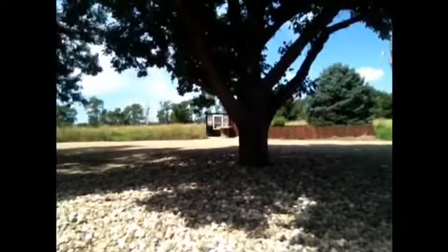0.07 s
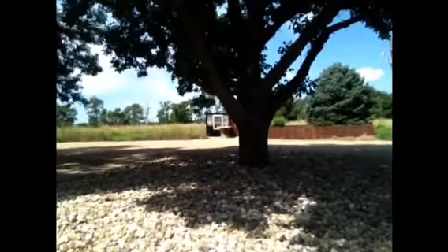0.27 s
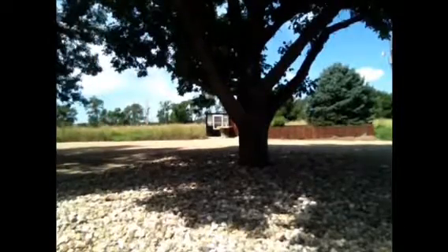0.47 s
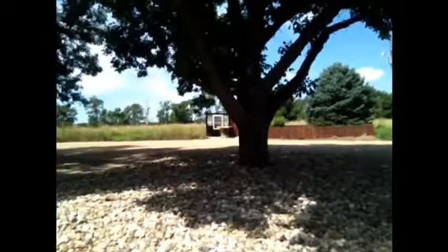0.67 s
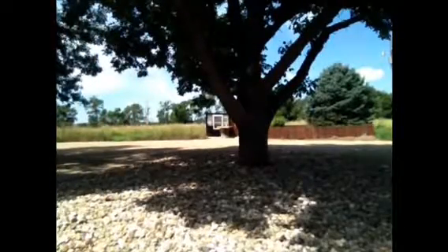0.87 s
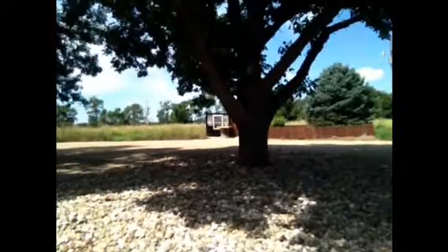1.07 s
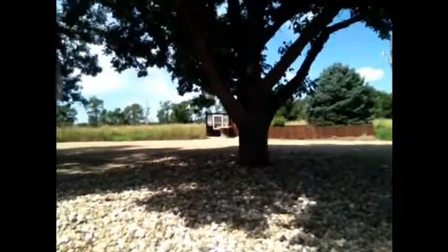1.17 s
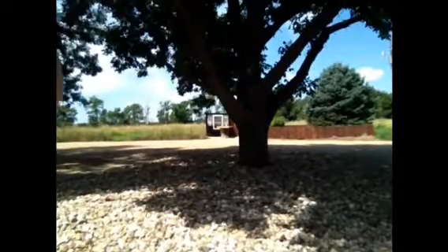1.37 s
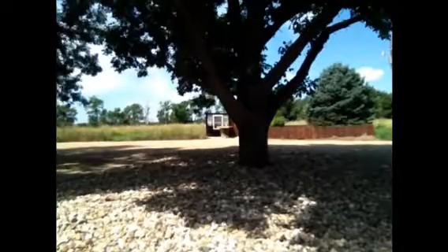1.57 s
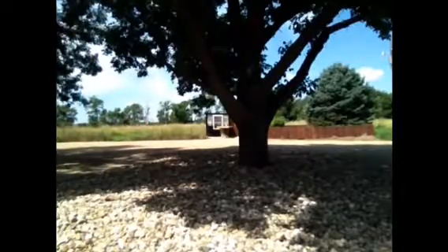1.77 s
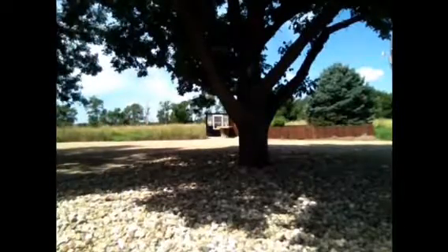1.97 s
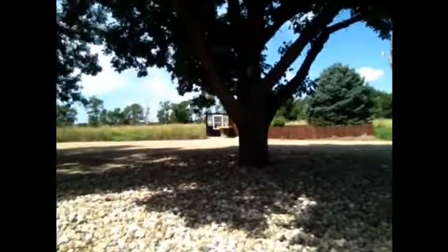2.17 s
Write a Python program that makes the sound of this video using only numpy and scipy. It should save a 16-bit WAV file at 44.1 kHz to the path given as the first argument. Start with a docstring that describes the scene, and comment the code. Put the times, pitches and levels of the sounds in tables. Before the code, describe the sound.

A hollow knock, as of a door closing near the microphone, breaks the quiet of a yard. Soft taps and ticks lead to two hard clacks and a settling rattle, over faint distant birds, low murmur and hiss.

```python
"""One hollow knock close by, as of a door shutting: a struck panel rings in its modes and a wall echoes it.
Small handling ticks and two soft taps follow, then two dry clacks of hard contact, each with a gritty
scuff, and a dull settling rattle. Around this quiet yard far birds whistle and trill, their sound
scattered by trees, over a low outdoor murmur and microphone hiss with one soft bump at the end."""
import sys
import numpy as np
from scipy import signal
from scipy.fft import rfft, irfft
from scipy.io import wavfile

SR = 44100
rng = np.random.default_rng(int(sys.argv[2]) if len(sys.argv) > 2 else 0)


def log_audio(samples):
    """Write samples as a 16-bit WAV file to the path given in sys.argv[1]."""
    # one column per channel
    frames = np.atleast_2d(samples).T
    # limit to full scale, then quantise
    limited = np.clip(frames, -1, 1)
    pcm = np.round(limited * 32767).astype(np.int16)
    wavfile.write(sys.argv[1], SR, pcm)


N = 97020


def undb(db):
    """Amplitude ratio of a level in decibels."""
    return 10 ** (np.asarray(db) / 20)

def seconds(length):
    """Time axis of the given length."""
    return np.arange(max(int(length * SR), 8)) / SR

def fade(t60):
    """Exponential decay by 60 dB in t60 seconds."""
    return np.exp(-np.log(1000) * np.arange(N) / SR / max(t60, 1e-4))

def unit(x):
    """Normalisation to rms 1."""
    return x / np.sqrt(np.mean(x ** 2))

def add(out, at, x):
    """Superposition: x joins out at a time in seconds."""
    i = int(np.clip(at * SR, 0, N - 1))
    out[i:i + len(x)] += x[:N - i]

def shape(x, gain):
    """Linear filtering: the spectrum is multiplied by gain(frequency)."""
    hz = np.arange(N + 1) * SR / (2 * N) + 0.00084  # the offset keeps log(hz) finite
    return irfft(rfft(x, 2 * N) * gain(hz))[:len(x)]

def colour(x, points, tilt_db=0):
    """Spectral shaping by (Hz, dB) points and a tilt per octave, at rms 1."""
    hz, db = np.array(points).T
    db = db + tilt_db * np.log2(hz)
    return unit(shape(x, lambda f: undb(np.interp(np.log(f), np.log(hz), db))
                      * np.minimum(f / hz[0], 1) ** 2))

def noise():
    """Gaussian white noise."""
    return rng.standard_normal(N)

def band(hz, width, order):
    """Band-pass noise; a higher order gives steeper sides."""
    return unit(shape(noise(), lambda f: 1 / (1 + np.abs((f * f - hz * hz) / (f * width)) ** order)))

def walk(rate_hz):
    """Random fluctuation: low-pass noise at rms 1."""
    return unit(shape(noise(), lambda f: np.exp(-(f / rate_hz) ** 2)))

def modes(table):
    """Free vibration: a sum of damped sinusoids of alternating sign."""
    t = seconds(.4)
    return sum((-1) ** k * undb(db) * np.sin(2 * np.pi * hz * t) * np.exp(-np.log(1000) * t / t60)
               for k, (hz, db, t60) in enumerate(table))

def reverberation(table, rise_s, width):
    """A diffuse field builds up, then decays band by band; width is a share of each centre."""
    bands = sum(undb(db) * band(hz, width * hz, order=4) * fade(t60) for hz, db, t60 in table)
    return (1 - fade(rise_s)) * bands


# Spectrum of the impact's crack. Each row: frequency in Hz, relative level in dB.
CRACK_SPECTRUM = [(300, 3), (1200, 3.5), (3200, -11), (4200, -4), (8000, -14), (10500, -20), (13500, -16),
                  (16000, -25.5)]
# Modes of the panel. Each row: frequency in Hz, level in dB, T60 in seconds.
PANEL_MODES = [(250, -22, 0.028), (311, -34.5, .22), (399, -32, 0.26), (453, -15.5, 0.053),
               (604, -25, 0.13), (669, -18, 0.063), (820, -22.5, 0.052), (882, -26.5, 0.053),
               (972, -18.5, .045), (1202, -13.5, 0.035), (2305, -17, 0.015), (2865, -17.5, 0.015),
               (3128, -19, 0.01)]
# Reverberation of the knock. Each row: band centre in Hz, level in dB, T60 in seconds.
KNOCK_REVERB = [(157, -42.5, 0.34), (230, -40, 0.42), (497, -26.5, 0.28), (860, -28, 0.23),
                (1418, -34, 0.16), (2610, -43, .21), (4450, -44.5, .21), (8120, -47.5, 0.24),
                (12980, -61, 0.56)]
# A first touch, then the full blow. Each row: start in seconds, gain in dB.
KNOCK_BLOWS = [(0.2094, -12), (0.2146, 2.5)]

def knock():
    """Impact excitation: a crack sets the panel's modes ringing; a wall reflects the midrange."""
    echo_delay_s, echo_db, echo_hz = .0283, -6, 810
    blow = undb(-16) * colour(noise(), CRACK_SPECTRUM) * fade(t60=.013)
    add(blow, 0, modes(PANEL_MODES))
    echo = undb(echo_db) * signal.lfilter(*signal.iirpeak(echo_hz, Q=1.4, fs=SR), blow)
    blow += reverberation(KNOCK_REVERB, rise_s=0.02, width=0.77)
    add(blow, echo_delay_s, echo)
    out = np.zeros(N)
    for at, db in KNOCK_BLOWS:
        add(out, at, undb(db) * blow)
    return out


# Modes of the clacked body. Each row: frequency in Hz, level in dB, T60 in seconds.
BODY_MODES = [(664, -19.5, 0.012), (686, -27.5, 0.095), (985, -14.5, 0.0094), (1450, -44, 0.088),
              (2339, -30.5, 0.089), (4030, -45.5, 0.093)]
# Reverberation of a clack. Each row: band centre in Hz, level in dB, T60 in seconds.
CLACK_REVERB = [(268, -39, 0.27), (518, -33.5, 0.12), (880, -31, 0.12), (1320, -32, 0.16),
                (2350, -37.5, 0.14), (4290, -45.5, 0.17), (7640, -48.5, 0.2)]
# Two clacks, then the rattle. Each row: start in seconds, gain in dB, contact pitch in Hz,
# contact T60 in seconds.
CLACK_HITS = [(1.5145, -1.5, 1575, 0.011), (1.7243, -5, 930, 0.0049), (1.7872, -32, 1320, .015),
              (1.7945, -24, 1440, 0.0073), (1.7979, -19.5, 1670, 0.014), (1.811, -26, 1640, 0.013),
              (1.817, -23.5, 1000, 0.0071), (1.8211, -29, 1700, 0.011), (1.8445, -27.5, 1475, 0.032)]

def clacks():
    """Hard contact excites damped vibration in a small body, a poor radiator of low frequencies."""
    contact_db, rise_s, radiation_cutoff_hz = -7.5, .002, 190
    out = np.zeros(N)
    for at, db, hz, t60 in CLACK_HITS:
        hit = reverberation(CLACK_REVERB, rise_s=0.0017, width=0.46)
        add(hit, 0, modes([(hz, contact_db, t60)]) + modes(BODY_MODES))
        add(out, at, undb(db) * hit * (1 - fade(rise_s)))
    return signal.sosfilt(signal.butter(2, radiation_cutoff_hz, "high", fs=SR, output="sos"), out)


# Spectrum of grit, in scuffs and ticks. Each row: frequency in Hz, relative level in dB.
GRIT_SPECTRUM = [(180, -26), (260, -10.5), (900, -2.5), (1280, -2.5), (1530, 10), (1950, -17), (2350, 9),
                 (2800, -12), (7500, -14.5), (15000, -24)]
# Gritty scuffs. Each row: start in seconds, length in seconds, level in dB, tilt in dB per octave.
SCUFF_STROKES = [(.2378, 0.0038, -36, 6), (1.522, 0.0066, -32.5, 0.5), (1.731, 0.025, -33, 0),
                 (1.774, 0.073, -45, -8)]

def scuffs():
    """Shot noise: dense random grains swell quickly with the pressure and trail off."""
    grains_per_s, swell_share = 3000, 0.14
    out = np.zeros(N)
    for at, length, db, tilt in SCUFF_STROKES:
        grains = noise() * (rng.random(N) < grains_per_s / SR)
        t = seconds(length)
        pressure = np.interp(t / length, [0, swell_share, 1], [0, 1, 0])
        add(out, at, undb(db) * colour(grains[:len(t)], GRIT_SPECTRUM, tilt) * pressure)
    return out


# Modes of the ticking part. Each row: frequency in Hz, relative level in dB, T60 in seconds.
PART_MODES = [(1280, -3, 0.022), (1517, -2.5, 0.021), (1730, -2, 0.0025), (2328, -3, 0.027),
              (2920, -8, 0.024), (4070, -25, 0.005), (7400, -24, 0.0079)]
# Spectrum of a tick's snap. Each row: frequency in Hz, relative level in dB.
SNAP_SPECTRUM = [(1000, -18), (3000, -1), (5500, 1), (7500, 0), (9800, -2.5), (11500, -20)]
# Handling ticks. Each row: start in seconds, level in dB, favoured frequency in Hz.
TICK_CONTACTS = [(0.9216, -38, 1440), (0.922, -32, 2830), (0.9348, -39.5, 7150), (0.96, -47, 2120),
                 (0.9742, -45.5, 1360), (1.1, -41.5, 2340), (1.141, -39.5, 1390), (1.169, -36.5, 2380),
                 (1.228, -44, 1200), (1.343, -47.5, 1190), (1.3927, -40.5, 1560)]

def ticks():
    """Selective excitation: each light contact favours different modes of one small hard part."""
    detune_share, fall_db_per_octave, rise_s = 0.035, 11, 0.00049
    out = np.zeros(N)
    for at, db, focus_hz in TICK_CONTACTS:
        tone = modes([(hz * (1 + detune_share * rng.standard_normal()),
                       level - fall_db_per_octave * abs(np.log2(hz / focus_hz)), t60)
                      for hz, level, t60 in PART_MODES])
        grit = undb(-21) * colour(noise(), GRIT_SPECTRUM) * fade(t60=0.17)
        snap_gain = undb(-10) * min(focus_hz / 2450, 1.7) ** 2  # brighter ticks snap harder
        tick = grit + snap_gain * colour(noise(), SNAP_SPECTRUM) * fade(t60=0.021)
        add(tick, 0, tone / np.abs(tone).max())
        add(out, at, undb(db) * tick * (1 - fade(rise_s)))
    return out


# Soft taps. Each row: start in seconds, gain in dB, band centre in Hz.
SOFT_TAPS = [(.476, -43.5, 2760), (1.006, -47.5, 790)]

def taps():
    """Broadband transients: soft touches make brief puffs of noise with no pitch."""
    rise_s = 0.013
    envelope = (1 - fade(rise_s)) * fade(t60=0.035)
    out = np.zeros(N)
    for at, db, hz in SOFT_TAPS:
        add(out, at, undb(db) * band(hz, 1.2 * hz, order=1.5) * envelope)
    return out


# Bird whistles. Each row: start and length in seconds, first and last pitch in Hz, level in dB.
BIRD_WHISTLES = [(0.27, 0.12, 5900, 4650, -68), (0.303, 0.033, 4080, 4100, -65),
                 (0.683, .095, 6670, 5230, -61.5), (0.688, 0.051, 6450, 6170, -65),
                 (2.106, .11, 5070, 4540, -71)]
# Bird trills. Each row: start and length in seconds, band centre and width in Hz, level in dB.
BIRD_TRILLS = [(.525, .1, 4270, 550, -68), (.558, .082, 5470, 250, -68), (.629, .18, 6000, 1200, -65),
               (.88, .3, 3400, 380, -66.5), (.89, .26, 4600, 750, -66), (.78, .39, 4200, 2000, -67.5),
               (1.256, .2, 6720, 280, -69.5), (1.23, .31, 5650, 1700, -63.5),
               (1.395, .11, 4350, 750, -64.5), (1.41, .09, 5650, 500, -67.5)]

def birds():
    """Frequency modulation slurs the whistles, amplitude modulation the trills; trees scatter both."""
    edge_s, waver_share, trill_hz, trill_depth, flicker_db = 0.013, 0.01, 46.7, 0.24, 1.5
    swell = lambda t: np.sin(np.pi / 2 * np.clip(np.minimum(t, t[-1] - t) / edge_s, 0, 1))
    out = np.zeros(N)
    for at, length, first_hz, last_hz, db in BIRD_WHISTLES:
        t = seconds(length)
        slur = np.linspace(1, 0, len(t)) ** 1.5  # glides fast, then levels off
        hz = (last_hz + (first_hz - last_hz) * slur) * (1 + waver_share * walk(150)[:len(t)])
        tone = np.sqrt(2) * np.sin(2 * np.pi * np.cumsum(hz) / SR)
        add(out, at, undb(db) * swell(t) * tone)
    for at, length, hz, width, db in BIRD_TRILLS:
        t = seconds(length)
        buzz = band(hz, width, order=2)[:len(t)]
        gain = undb(db + flicker_db * walk(42)[:len(t)])
        pulsing = 1 + trill_depth * np.sin(2 * np.pi * trill_hz * t)
        add(out, at, gain * swell(t) * pulsing * buzz)
    tree_response = unit(noise() * fade(t60=0.28)) / np.sqrt(N)
    return out + undb(-2) * signal.fftconvolve(out, tree_response)[:N]


# Spectrum of the outdoor murmur. Each row: frequency in Hz, relative spectral density in dB.
MURMUR_SPECTRUM = [(50, -11.5), (100, -7.5), (170, -7.5), (228, 1), (290, -10), (360, -1.5), (450, -5),
                   (600, -13), (1000, -16.5), (1400, -19), (2000, -21), (4300, -23), (8000, -47)]
# Spectrum of the microphone hiss. Each row: frequency in Hz, relative spectral density in dB.
HISS_SPECTRUM = [(2000, -16.5), (4500, -10.5), (7800, -8), (9500, -4.5), (10700, -1), (12000, -4),
                 (14000, -6), (15500, -8.5)]

def background():
    """The noise floor: a wavering low murmur and steady hiss, with one damped bump on the microphone."""
    murmur_db, waver_db, hiss_db = -58.5, 2.5, -58
    bump_at_s, bump_hz, bump_db, bump_t60_s = 2.187, 148, -42.5, 0.36
    murmur = undb(murmur_db + waver_db * walk(2.4)) * colour(noise(), MURMUR_SPECTRUM)
    out = murmur + undb(hiss_db) * colour(noise(), HISS_SPECTRUM)
    add(out, bump_at_s, modes([(bump_hz, bump_db, bump_t60_s)]))
    return out


def scene():
    """Superposition of all sources at one microphone."""
    return (knock() + clacks() + scuffs() + ticks() + taps() + birds() + background())[None]

def record(dry):
    """Band limiting: the small microphone loses the bass and the recorder cuts the top."""
    low_hz, top_hz = 130, 15500
    thin = signal.sosfilt(signal.butter(2, low_hz, "high", fs=SR, output="sos"), dry)
    return signal.sosfilt(signal.ellip(12, .2, 70, top_hz, fs=SR, output="sos"), thin)


dry = scene()
out = record(dry)
log_audio(out)
```